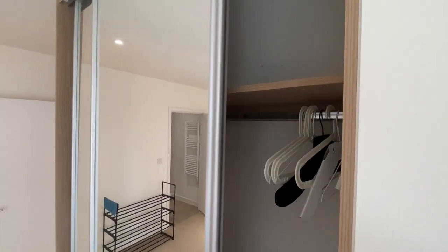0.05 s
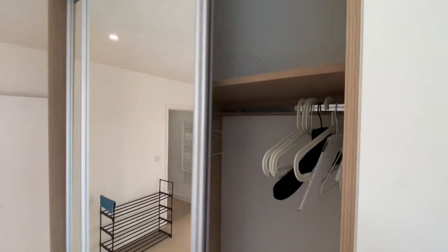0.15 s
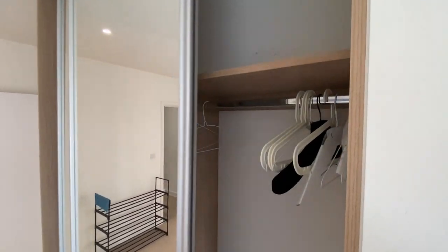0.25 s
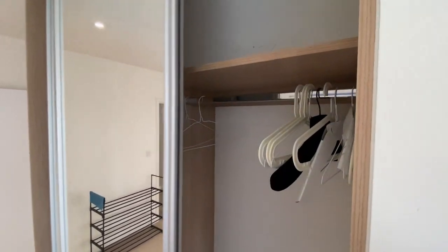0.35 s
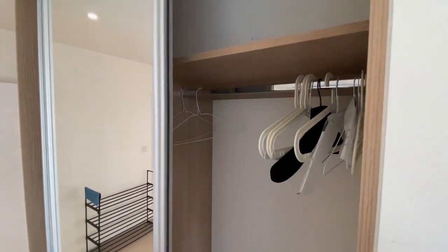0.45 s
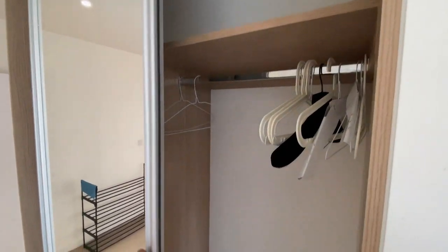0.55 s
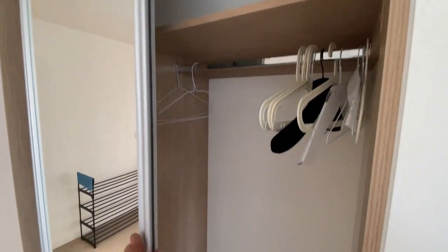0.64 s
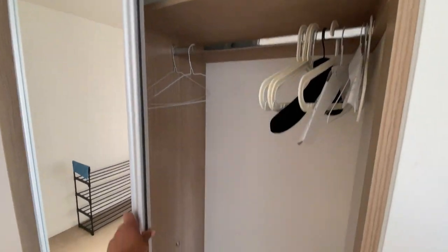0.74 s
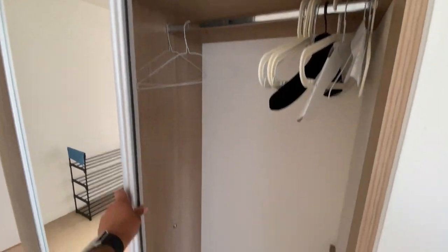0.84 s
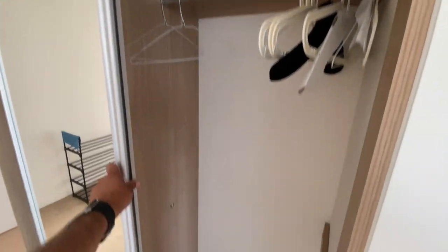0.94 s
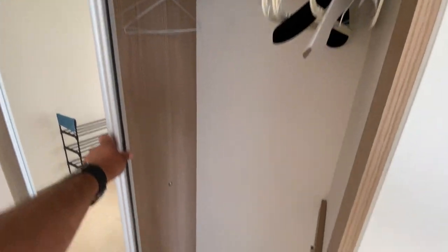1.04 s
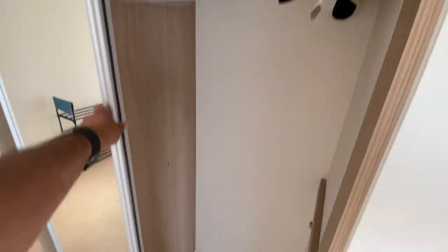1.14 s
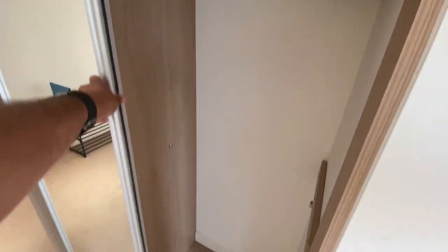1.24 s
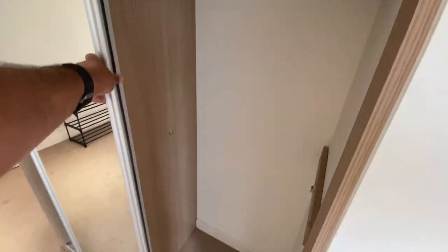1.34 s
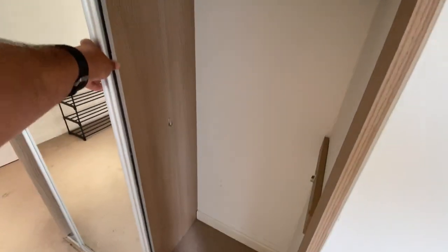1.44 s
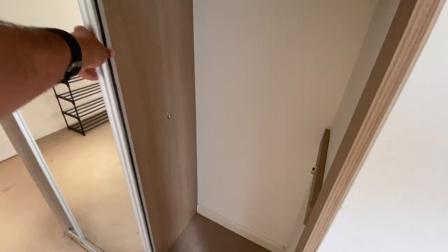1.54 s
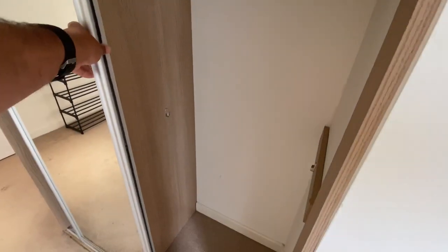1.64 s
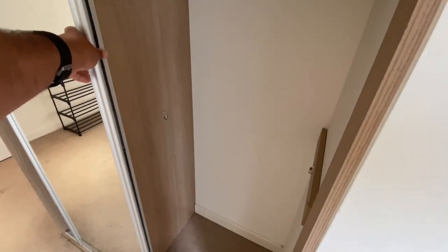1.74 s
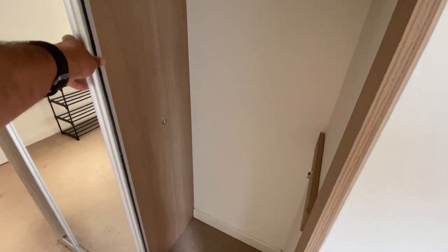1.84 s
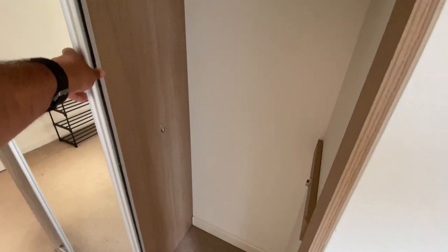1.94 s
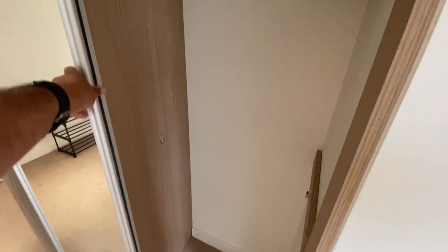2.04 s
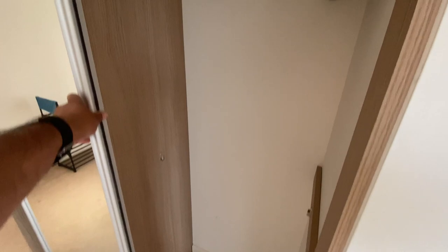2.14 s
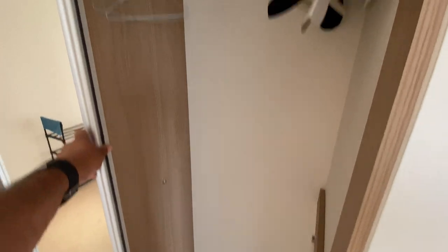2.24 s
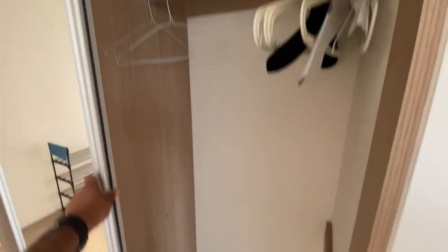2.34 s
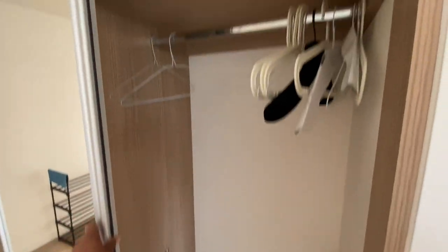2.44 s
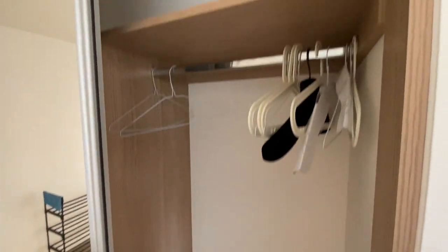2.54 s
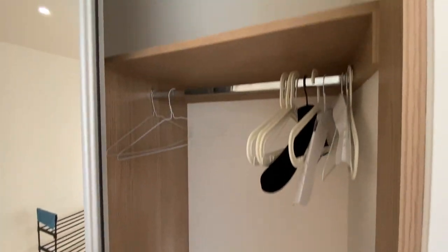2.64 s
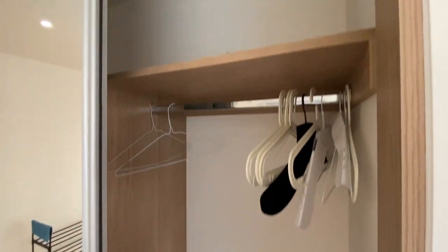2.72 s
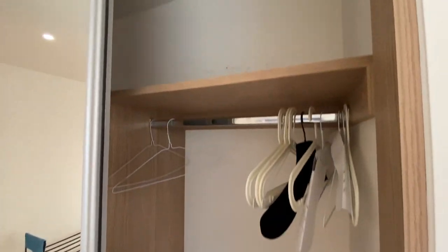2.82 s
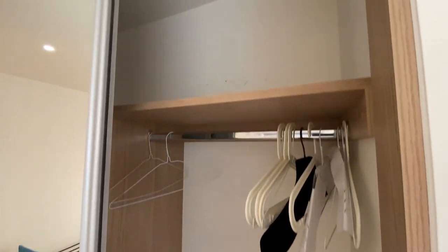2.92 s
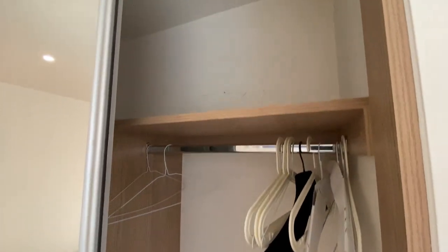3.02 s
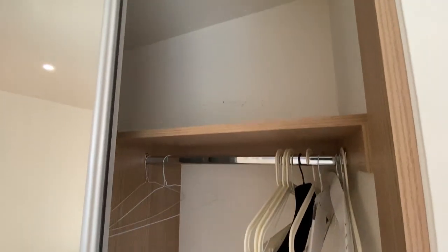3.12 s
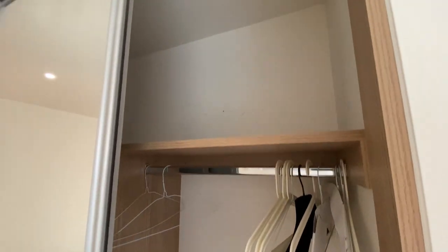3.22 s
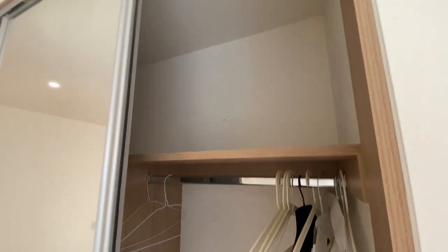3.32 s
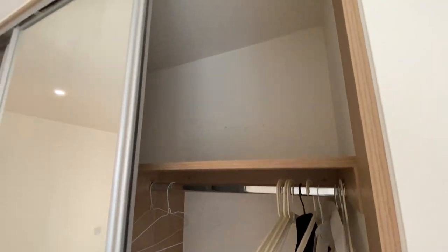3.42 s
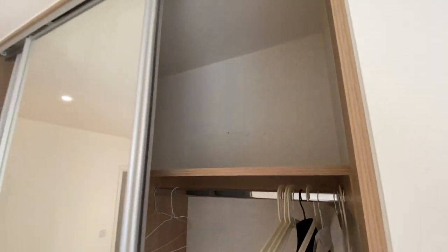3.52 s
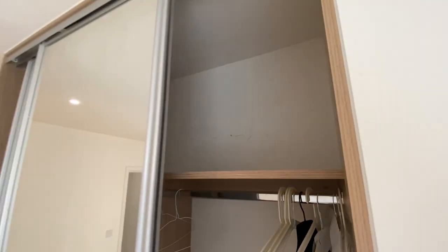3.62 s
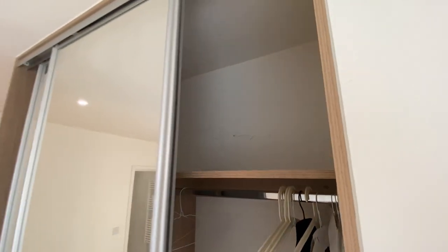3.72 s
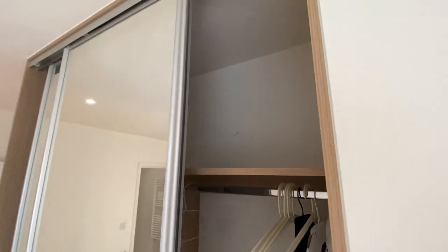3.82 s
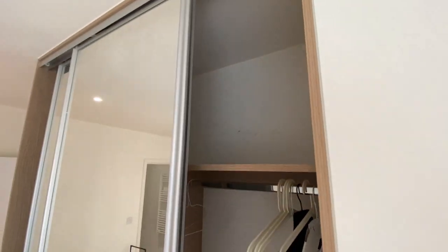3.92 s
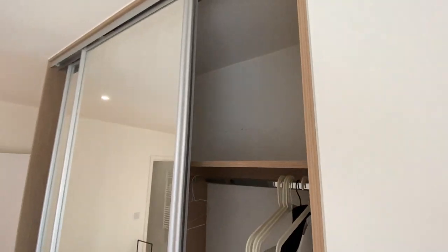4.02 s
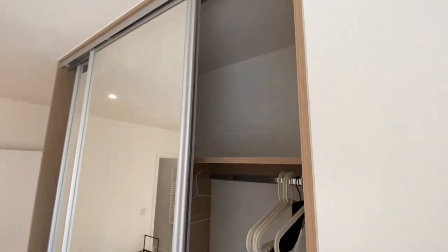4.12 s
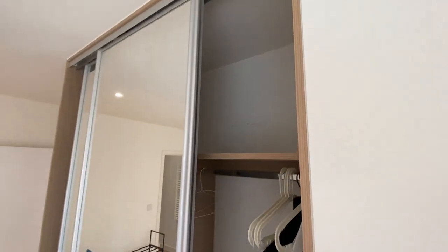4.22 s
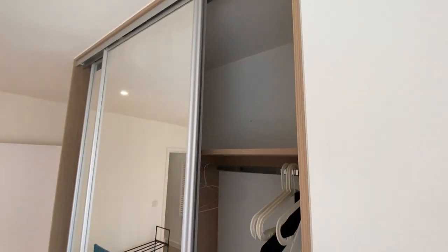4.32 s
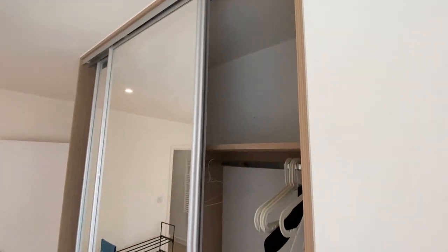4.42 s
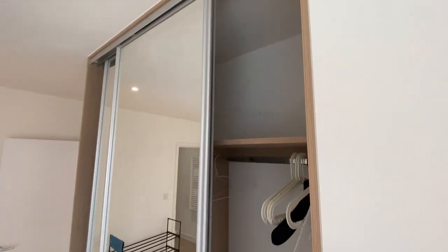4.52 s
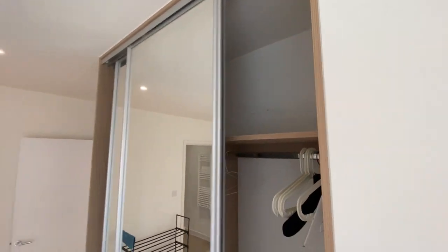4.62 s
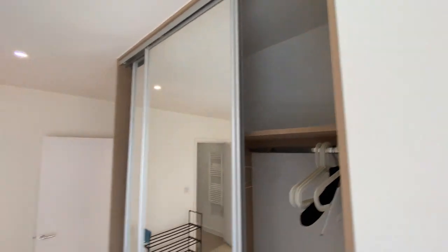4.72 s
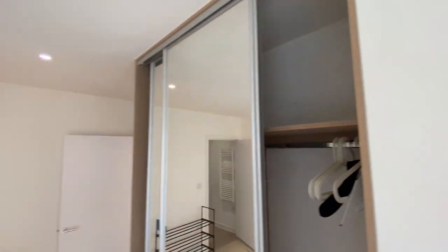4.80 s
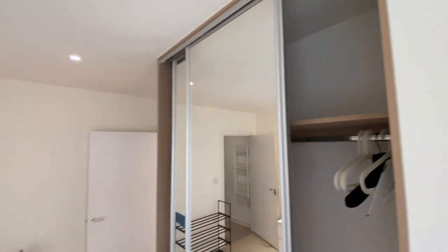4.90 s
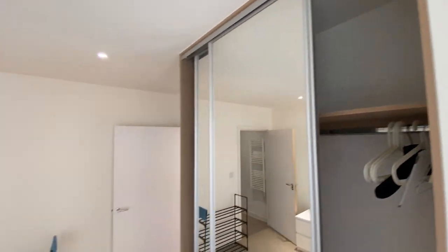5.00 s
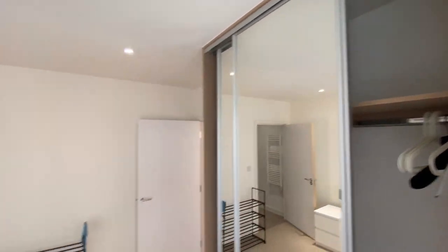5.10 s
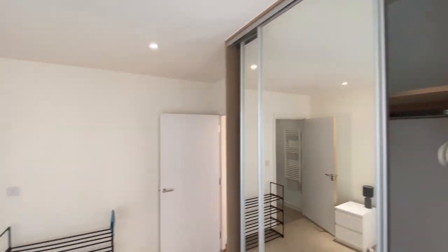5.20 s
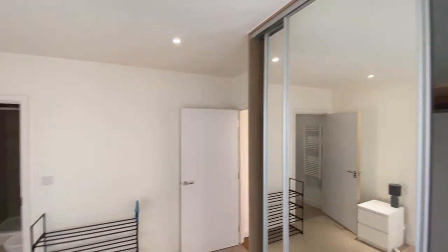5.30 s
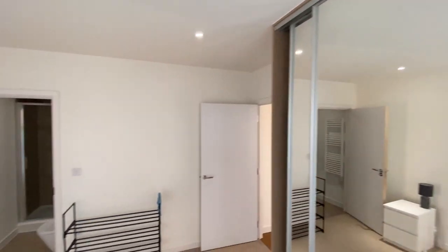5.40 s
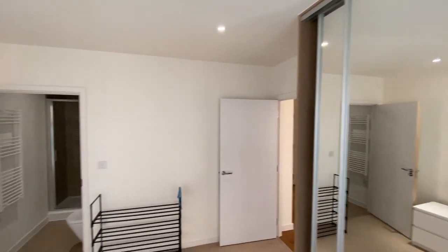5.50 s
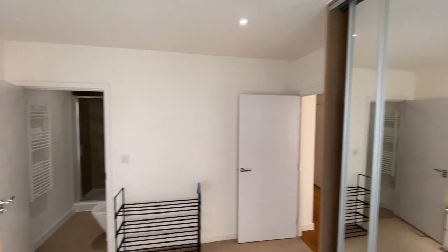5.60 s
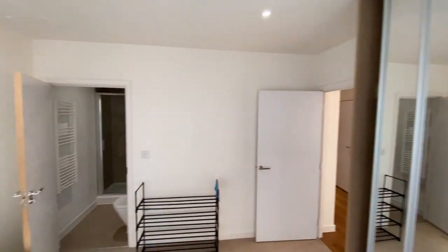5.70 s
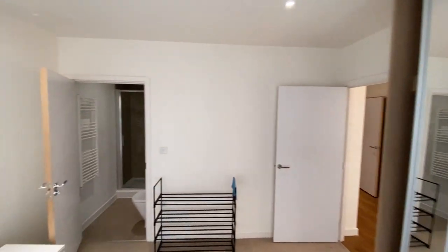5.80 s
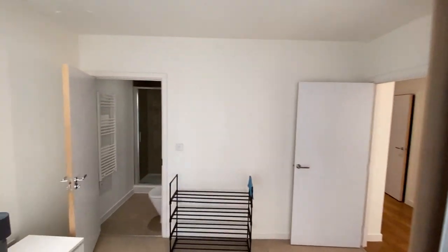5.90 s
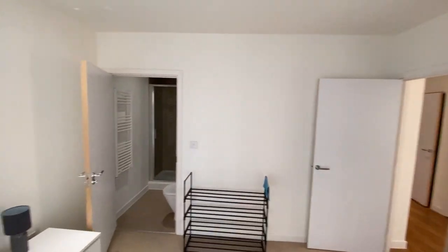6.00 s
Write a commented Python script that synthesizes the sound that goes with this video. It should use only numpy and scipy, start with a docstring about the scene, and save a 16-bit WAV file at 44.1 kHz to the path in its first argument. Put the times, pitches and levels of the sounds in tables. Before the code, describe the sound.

A sliding wardrobe door rumbles open with rattling metal clicks, pauses, then rolls back and clacks against its stop.

```python
"""Sliding wardrobe door

A mirrored, metal-framed door slides open, rests and slides back in a bare, quiet bedroom. Its speed
drives the panel's rumble, the rollers' crunch and chatter, and the hiss of its edge on the guide.
Track flaws ping the frame, a roller squeaks, and the frame clacks at the stop. Clothes and shoes
scuff, fingers bump the two microphones, and the building murmurs throughout."""
import sys
import numpy as np
from scipy import signal
from scipy.fft import rfft, irfft
from scipy.io import wavfile
from scipy.ndimage import uniform_filter1d

SR = 44100
rng = np.random.default_rng(int(sys.argv[2]) if len(sys.argv) > 2 else 0)


def materialize(psi):
    """Save the field psi as 16-bit PCM at rate SR to the path in sys.argv[1].

    A 1-D psi becomes a single channel; in a 2-D psi each row is a channel.
    """
    bounded = np.clip(np.atleast_2d(psi).T, -1, 1)
    quanta = np.round(bounded * 32767).astype(np.int16)
    wavfile.write(sys.argv[1], SR, quanta)


N = 266883
T = np.arange(N) / SR
LAG_SAMPLES, DOOR_LEAD_SAMPLES = 21, 11  # left microphone against right

# Door eased back, pushed, nudged home. Each row: time in seconds, share of full speed.
CLOSING_SPEED = [(2.449, 0.14), (2.49, .17), (2.72, 0.17), (3.05, 0.24), (3.23, 0.11), (3.36, 0.22),
                 (3.57, 0.2), (3.72, 0.53), (3.81, 0.76), (3.88, .66), (3.969, 0.34), (4.08, 0.05),
                 (4.27, 0.23), (4.36, 0.24), (4.53, 0)]
# Hollow cabinet resonances. Each row: frequency in Hz, width in Hz, lift in dB.
CABINET_MODES = [(422, 13, 1.5), (645, 24, 3.5), (885, 94, 5.5), (1050, 18, 4), (1224, 36, 6),
                 (1546, 100, 3.5), (1977, 58, 3.5)]
# Metal striking metal. Each row: frequency in Hz, relative level in dB.
CRACK_SPECTRUM = [(1500, -12), (2700, 1.5), (4200, 8), (5400, 2), (6400, -21), (7500, -13), (10800, -16),
                  (12000, -59)]
# Finger bumps. Each row: start in seconds, relative level in dB, pitch in Hz.
FINGER_BUMPS = [(1.244, -51, 530), (1.345, -62, 557), (1.422, -55, 355), (4.495, -52.5, 450),
                (4.637, -50.5, 548), (5.595, -60.5, 520), (5.671, -54, 490), (6.014, -51.5, 513)]


def amp(db):
    return 10 ** (np.asarray(db) / 20)


def unit(x):
    """Scales to rms 1."""
    return x / np.sqrt(np.mean(x ** 2) + 1e-20)


def read(points, hz):
    """Interpolates on a log-frequency axis."""
    f, value = np.transpose(points)
    return np.interp(np.log(hz + 1), np.log(f + 1), value)


def bins(x):
    return np.fft.rfftfreq(x.shape[-1], 1 / SR)


def colour(x, spectrum):
    """Filters by a spectrum; rms 1."""
    return unit(irfft(rfft(x) * amp(read(spectrum, bins(x))), x.shape[-1]))


def add(mix, start_s, sound):
    part = mix[:, max(round(start_s * SR), 0):][:, :sound.shape[-1]]
    part += sound[..., :part.shape[-1]]


def lowpass(x, hz):
    return irfft(rfft(x) / (1 + (bins(T) / hz) ** 4), N)


def wander(rate_hz):
    """Random drift, rms 1."""
    return unit(lowpass(rng.standard_normal(N), rate_hz))


def swells(rows):
    """Gain from a sum of Gaussian swells."""
    return sum(amp(db) * np.exp(-((T - s) / half_s) ** 2) for s, db, half_s in rows)


def burst(t, rise_s, decay_s):
    return np.exp(-t / decay_s) * (1 - np.exp(-t / rise_s))


def grains(per_s):
    """Three rows of sparse random impulses."""
    return rng.standard_normal((3, N)) * (rng.random((3, N)) < per_s / SR)


def stereo(three, share, lag):
    """Row 0 reaches both microphones, the left lag samples late; rows 1 and 2 are scattered sound."""
    common = np.array([np.roll(three[0], lag), three[0]])
    return np.sqrt(share) * common + np.sqrt(1 - share) * three[1:]


def noise(share, size=N, lag=LAG_SAMPLES):
    """Stereo white noise with a common share of power."""
    return stereo(rng.standard_normal((3, size)), share, lag)


def resonate(x, modes):
    """Lifts narrow resonances."""
    lift_db = sum(db / (1 + (2 * (bins(x) - hz) / width_hz) ** 2) for hz, width_hz, db in modes)
    return irfft(rfft(x) * amp(lift_db), N)


def cabinet(x, t60_s, share, direct, lag):
    """Direct sound plus quick echoes off the cabinet walls, different at each microphone."""
    response = rng.standard_normal((2, 5000)) * amp(-60 * T[:5000] / t60_s)
    echoes = signal.fftconvolve(x[:1], response, axes=1)[:, :N]
    heard = direct * unit(stereo(x, share=1, lag=lag)) + unit(echoes)
    return np.sqrt(share) * unit(heard) + np.sqrt(1 - share) * unit(x[1:])


def room(x):
    """Sparse reflections off bare walls; each band decays at its own rate."""
    # Each row: frequency in Hz, t60 in seconds.
    decay = [(100, 0.97), (400, 0.49), (1200, 0.37), (3500, 0.48), (6000, 0.36), (11000, 0.3)]
    taps = rng.standard_normal((2, SR)) * (rng.random((2, SR)) < 0.12)
    hz, t, bands = signal.stft(taps, SR, nperseg=256)
    bands = bands * amp(-60 * t / read(decay, hz)[:, None])
    tail = signal.istft(bands, SR, nperseg=256)[1][:, :SR]
    tail *= np.clip((T[:SR] - 0.002) / 0.0013, 0, 1)
    return signal.fftconvolve(x, tail / np.linalg.norm(tail[0]), axes=1)[:, :N]


def travel():
    """Door speed and opening, as shares of full."""
    # Each row: time in seconds, share of full speed.
    opening_speed = [(0.0, 0.726), (0.5, 0.99), (0.62, 0.87), (0.74, 0.91), (0.82, 0.69), (0.9, 0.55),
                     (1.0, 0.77), (1.12, 0.55), (1.22, 0.2), (1.28, 0.2), (1.41, 0.042), (1.6, 0.024)]
    out = np.interp(T, *np.transpose(opening_speed), left=0, right=0)
    back = np.interp(T, *np.transpose(CLOSING_SPEED), left=0, right=0)
    return out + back, np.cumsum(out) / out.sum() - np.cumsum(back) / back.sum()


def sliding(full_speed_db, exponent, open_db=0):
    """Gain as a power of door speed, shifted by open_db when wide open."""
    speed, opened = travel()
    return amp(full_speed_db + open_db * opened) * speed ** exponent


def rumble():
    """The uneven track shakes the heavy panel's low modes; it booms less deeply on closing."""
    # Each row: frequency in Hz, width in Hz, relative level in dB opening, the same closing.
    panel_modes = [(53.4, 4.5, -11, -8), (59.6, 9.7, 5, 0), (97.7, 12.6, -4.5, 2.5), (124.1, 9.8, -2, 4),
                   (145, 8.6, -19, -10), (185, 97, -18.5, -14), (290, 32, -19.5, -19.5),
                   (410, 68, -23.5, -13)]
    # The open door trembles under the hand. Each row: centre in seconds, level in dB, half length in s.
    trembles = [(1.88, -64.5, 0.2), (2.3, -68, 0.095), (2.62, -69.5, 0.17)]
    shake, swings = rfft(noise(share=0.76)), []
    hz, width_hz, opening_db, closing_db = np.transpose(panel_modes)[:, :, None]
    for db in (opening_db, closing_db):
        response = (amp(db) / (1 + (2 * (bins(T) - hz) / width_hz) ** 2)).sum(0)
        swing = unit(irfft(shake * response, N))
        envelope = np.sqrt(abs(uniform_filter1d((swing ** 2).mean(0), size=2400)) + 1e-6)
        swings.append(unit(swing / envelope))  # rolling keeps the swing even
    gain = sliding(full_speed_db=-40, exponent=1.85) + swells(trembles)
    return gain * np.where(T < CLOSING_SPEED[0][0], *swings)


def rollers():
    """Wheels crunch over fine grit, coloured by the hollow cabinet."""
    # Each row: frequency in Hz, relative level in dB.
    spectrum = [(150, 3), (300, -2.5), (560, -5.5), (900, -3.5), (1150, -4), (1500, -6), (1900, -7),
                (2400, -4.5), (4000, -7.5), (6000, -14), (10000, -51)]
    grit = cabinet(grains(per_s=1800), t60_s=0.066, share=0.6, direct=0.68, lag=LAG_SAMPLES)
    gain = amp(0.97 * wander(rate_hz=34)) * sliding(full_speed_db=-51, exponent=0.68, open_db=-9)
    return gain * colour(resonate(grit, CABINET_MODES), spectrum)


def rubbing():
    """The door's edge drags along its guide: a fluttering hiss with thin metal resonances."""
    # Each row: frequency in Hz, relative level in dB.
    spectrum = [(900, -11), (2200, -4.5), (3100, 0.5), (4300, -2), (4900, 0), (5500, -3), (6800, -3),
                (7200, -10.5), (8800, -5.5), (10700, -10), (11700, -30.5), (14000, -30), (15500, -35)]
    # Each row: frequency in Hz, width in Hz, lift in dB.
    rail_modes = [(3267, 78, 7), (4230, 120, 6), (5500, 35, 13.5), (6130, 280, 5.5), (6540, 39, 5.5),
                  (6800, 40, 3), (8640, 47, 5), (10000, 230, 1.5)]
    # The edge presses on the guide. Each row: centre in seconds, level in dB, half length in seconds.
    scrapes = [(0.035, -36.5, 0.05), (0.28, -44, 0.12), (3.62, -62, 0.034), (3.865, -45.5, 0.073),
               (4.32, -66, 0.04)]
    friction = rng.standard_normal((3, N))
    hiss = cabinet(friction, t60_s=0.027, share=0.69, direct=0.24, lag=-DOOR_LEAD_SAMPLES)
    gain = sliding(full_speed_db=-63, exponent=0.65, open_db=-7) + swells(scrapes)
    return amp(wander(rate_hz=41)) * gain * colour(resonate(hiss, rail_modes), spectrum)


def air():
    """The building's low murmur wavers under a faint, steady hiss."""
    # Each row: frequency in Hz, relative level in dB.
    spectrum = [(20, -46), (40, -14.5), (64, -4), (100, -7.5), (150, -17.5), (230, -12), (420, -24),
                (720, -28), (890, -22), (1120, -30.5), (2000, -29), (2400, -39), (7000, -41),
                (11000, -51.5), (14000, -90)]
    # The murmur rises with handling and steps. Each row: time in seconds, gain in dB.
    murmur = [(1.4, 5.5), (1.65, 1.5), (2.05, -1), (2.18, -5.5), (2.3, -0.5), (4.5, 3.5), (4.85, 1),
              (5.35, 4), (5.75, -2)]
    murmur_db = np.interp(T, *np.transpose(murmur)) + 2.1 * wander(rate_hz=2.6)
    steady = colour(noise(share=0.17), spectrum)
    return amp(-65.5) * (steady + lowpass(steady, hz=500) * (amp(murmur_db) - 1))


def chatter(full_speed_per_s=18, level_db=-45, spread_db=1.5, exponent=1.8, tries=400):
    """Small random knocks, denser and harder with speed. Yields start in seconds, level in dB."""
    speed = travel()[0]
    for when, chance, force in rng.random((tries, 3)):
        i = int(when * N)
        if chance < full_speed_per_s * speed[i] * T[-1] / tries:
            yield T[i], level_db + spread_db * (2 * force - 1) + 20 * exponent * np.log10(speed[i])


def blows(firm_db=-35):
    """Frame blows and one footstep tick: duller when soft, lower and duller as the door opens."""
    # Rollers hit track flaws. Each row: start in seconds, relative level in dB.
    track_knocks = [(0.1462, -32.5), (0.182, -32), (0.1967, -34), (0.2325, -33.5), (0.2876, -36.5),
                    (0.4178, -37.5), (0.4285, -37), (0.4604, -37.5), (0.4753, -36.5), (0.523, -32),
                    (0.5628, -43), (0.6053, -38.5), (0.6779, -33.5), (0.7293, -42.5), (0.7549, -41.5),
                    (0.8305, -39.5), (0.9037, -35), (0.9614, -48.5), (0.9995, -35.5), (1.0225, -42.5),
                    (1.0611, -44), (1.0937, -38.5), (1.2594, -49), (1.279, -52.5), (2.2471, -63.5),
                    (2.4727, -60), (2.815, -47.5), (2.9618, -46), (3.0275, -49), (3.0953, -48),
                    (3.6544, -33), (3.7616, -38.5), (3.7695, -36), (3.8147, -37.5), (4.0715, -57.5)]
    # The frame clacks at its stop and settles; last, a faint footstep tick.
    # Each row: start in seconds, relative level in dB.
    clacks_and_step = [(4.1125, -39), (4.119, -31), (4.2937, -41), (4.3224, -48), (4.541, -64),
                       (4.572, -66), (5.0654, -61.5)]
    # Each row: share open, ping pitch in Hz, treble gain in dB.
    ping_by_opening = [(0, 4160, -0.5), (.5, 4026, -3), (.68, 3660, -4), (1, 3440, -5.5)]
    opened = travel()[1]
    shares, pitches_hz, trebles_db = np.transpose(ping_by_opening)
    kinds = [(clacks_and_step, -14, -14.5), (track_knocks + list(chatter()), -5.5, -18.5)]
    for rows, body_db, tick_db in kinds:
        for start_s, db in rows:
            place = opened[round(start_s * SR)]
            dull_db = 0.2 * (firm_db - db)
            hz = np.interp(place, shares, pitches_hz)
            treble_db = np.interp(place, shares, trebles_db) - dull_db
            yield start_s, db, hz, body_db + dull_db, tick_db, treble_db


def frame_ping(t, hz, detune=0.026):
    """The metal frame's modes start nearly in phase, slightly retuned for each blow."""
    # Each row: multiple of the pitch, relative level in dB, t60 in seconds.
    frame_modes = [(.7, -22, 0.028), (.87, -3.5, 0.054), (1.001, 5.5, 0.024), (1.11, -1.5, 0.025),
                   (1.26, -2, 0.0037), (1.47, -16, 0.0059)]
    ratio, level_db, t60_s = np.transpose(frame_modes)[:, :, None]
    hz = hz * (1 + detune * rng.uniform(-1.22, 1))
    turns = ratio * hz * t + 0.11 * rng.standard_normal((2, len(frame_modes), 1))
    ping = (amp(level_db - 60 * t / t60_s) * np.sin(2 * np.pi * turns)).sum(1)
    ping *= 1 - np.exp(-(t / 0.00034) ** 2)
    return amp(12.5) * ping / np.linalg.norm(ping, axis=1, keepdims=True)


def bend(x, lag_s, top_hz):
    """Bending waves in the panel travel as the root of frequency: lows arrive late."""
    hz = bins(x)
    delay_s = lag_s * np.maximum(np.sqrt(top_hz / (hz + 300)) - 1, 0)
    return irfft(rfft(x) * np.exp(-2j * np.pi * np.cumsum(delay_s) * hz[1]), N)


def knocks():
    """Blows ping the frame, tick and spread into panel and cabinet; the footstep shares this sound."""
    # Each row: frequency in Hz, relative level in dB.
    tick_spectrum = [(1500, -8), (2800, 3), (4500, -1.5), (6300, 2.5), (7400, -7.5), (9500, -5),
                     (11000, -14.5), (12000, -38), (14500, -40)]
    # Each row: frequency in Hz, relative level in dB.
    body_spectrum = [(120, -6), (400, 1), (700, 4.5), (1100, 7.5), (1600, 1.5), (2500, -2.5), (4000, -13.5),
                     (7000, -49)]
    pings, spread, t = np.zeros((2, N)), np.zeros((2, N)), T[:6000]
    crack = burst(t, rise_s=0.00051, decay_s=0.0036)
    for start_s, db, hz, body_db, tick_db, treble_db in blows():
        ping = frame_ping(t, hz)
        tick = colour(noise(share=0.26, size=t.size, lag=-DOOR_LEAD_SAMPLES), tick_spectrum)
        tick *= amp(tick_db + treble_db) * (burst(t, rise_s=0.0019, decay_s=0.02) + 1.73 * crack)
        body = colour(noise(share=0.24, size=t.size), body_spectrum)
        body *= amp(body_db - 6.5) * (np.exp(-t / 0.015) + 0.29 * crack)
        clack = colour(noise(share=0.58, size=t.size, lag=0), CRACK_SPECTRUM)
        clack *= amp(treble_db - 4) * crack
        add(pings, start_s + 0.0008, amp(db) * (ping + clack))
        add(spread, start_s, amp(db) * (tick + body))
    # The near edge is heard first on the left; the broad panel fills the room.
    near = np.array([amp(2) * pings[0], amp(3) * np.roll(pings[1], DOOR_LEAD_SAMPLES)])
    spread = amp(1.06) * resonate(spread, CABINET_MODES)
    diffuse = amp(-6) * room(pings) + spread + amp(0.5) * room(spread)
    return near + bend(diffuse, lag_s=0.005, top_hz=4225)


def bumps(peak_s=0.0019):
    """Finger taps at the microphones ring dully for a few cycles."""
    out, t = np.zeros((2, N)), T[:3000]
    envelope = t / peak_s * np.exp(1 - t / peak_s)
    for start_s, db, hz in FINGER_BUMPS:
        ring = np.sin(2 * np.pi * hz * t) + 0.43 * np.sin(2 * np.pi * 1.34 * hz * t)
        add(out, start_s - 0.001, amp(db - 5) * envelope * ring)
    return out + amp(-1) * room(out)


def thuds(floor_hz=52, fall_s=0.01046, peak_s=0.02):
    """Each bump sinks into a soft thud, opposite in polarity at the two microphones."""
    out, t = np.zeros((2, N)), T[:5000]
    envelope = (t / peak_s * np.exp(1 - t / peak_s)) ** 3
    for start_s, db, hz in FINGER_BUMPS:
        turns = np.cumsum(floor_hz + (hz - floor_hz) * np.exp(-t / fall_s)) / SR
        thud = amp(db + 2.5) * envelope * np.sin(2 * np.pi * turns)
        add(out, start_s, thud * np.array([[1], [-0.6]]))
    return out


def squeak():
    """A dry roller whistles thinly as the door starts back."""
    # Each row: time in seconds, pitch in Hz, level in dB.
    contour = [(2.24, 10400, -102), (2.35, 11380, -101), (2.44, 10600, -106), (2.485, 10100, -87),
               (2.51, 9500, -104)]
    s, hz, db = np.transpose(contour)
    turns = np.cumsum(np.interp(T, s, hz) * (1 + 0.003 * wander(rate_hz=90))) / SR
    gain = amp(np.interp(T, s, db)) * (T > s[0]) * (T < s[-1])
    tone = gain * np.sin(2 * np.pi * turns) * np.ones((2, 1))
    return tone + room(tone)


def scuffs():
    """Cloth and soles brush softly, grainy from catching fibres."""
    # Each row: centre in seconds, level in dB, half length in seconds.
    strokes = [(3.405, -63, 0.037), (3.48, -65, 0.048), (3.625, -58, 0.022), (4.36, -60, 0.058),
               (4.62, -74, 0.13), (4.772, -52, 0.04), (4.84, -66, 0.023), (5.158, -67, 0.12),
               (5.876, -65, 0.082), (6.033, -69.5, 0.049)]
    # Each row: frequency in Hz, relative level in dB.
    spectrum = [(120, -39), (220, -6), (450, -10), (700, -10), (1000, -3.5), (1400, -5.5), (2100, -7.5),
                (2600, -12.5), (4200, -18), (6600, -20.5), (7300, -28), (10700, -30), (12000, -53),
                (15000, -68)]
    fibres = cabinet(grains(per_s=5000), t60_s=0.039, share=0.17, direct=0.49, lag=LAG_SAMPLES)
    sound = swells(strokes) * colour(fibres, spectrum) * amp(2.2 * wander(rate_hz=100))
    return sound + amp(-2.5) * room(sound)


def catch(start_s=4.1195):
    """The returning door meets its stop with one short, bright snap."""
    out, t = np.zeros((2, N)), T[:2000]
    snap = colour(noise(share=0.35, size=t.size, lag=-DOOR_LEAD_SAMPLES), CRACK_SPECTRUM)
    add(out, start_s, amp(-33.5) * snap * burst(t, rise_s=0.00025, decay_s=0.0014))
    return out + amp(-12) * room(out)


def scene():
    door = rumble() + rollers() + rubbing() + squeak() + knocks() + catch()
    return door + scuffs() + bumps() + thuds() + air()


def record(dry):
    """Two microphones of unequal colour, low-passed at 15.2 kHz."""
    # Each row: frequency in Hz, left minus right in dB.
    balance = [(60, -4.5), (130, -8), (340, -7), (600, 1), (1800, -3.5), (3400, 5), (6000, 1.5),
               (10000, -2)]
    tilt_db = read(balance, bins(dry)) * np.array([[0.5], [-0.5]])
    heard = irfft(rfft(dry) * amp(tilt_db), N)
    band_limit = signal.firwin(511, 15200, window=("kaiser", 9), fs=SR)
    return signal.oaconvolve(heard, band_limit[None], "same")


dry = scene()
out = record(dry)
materialize(out)
```